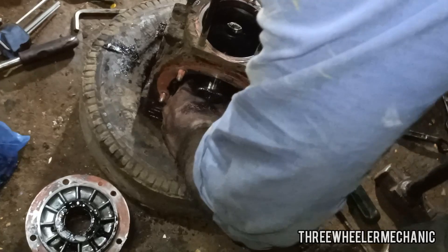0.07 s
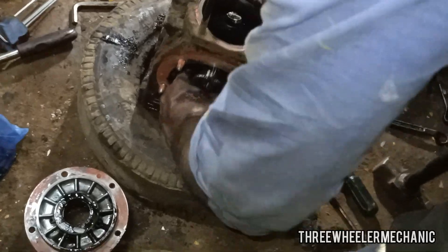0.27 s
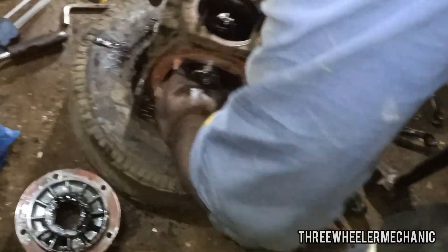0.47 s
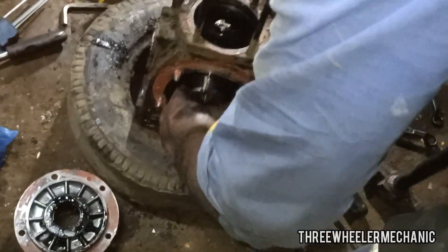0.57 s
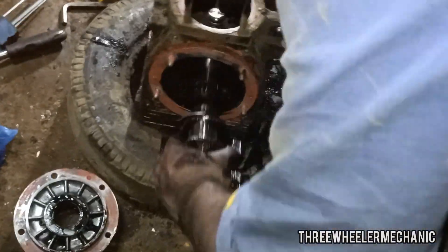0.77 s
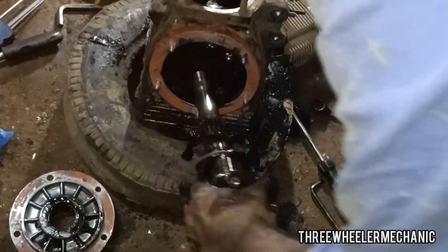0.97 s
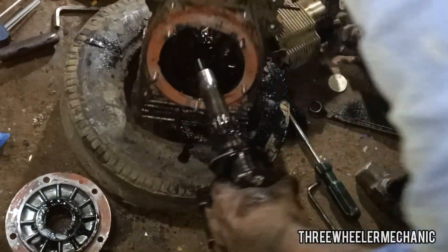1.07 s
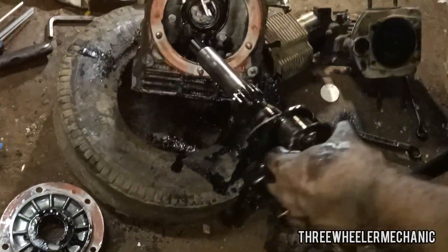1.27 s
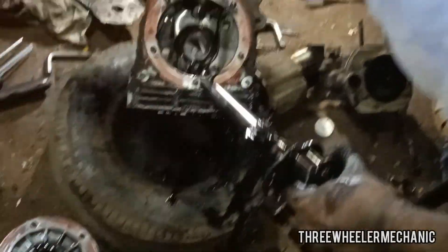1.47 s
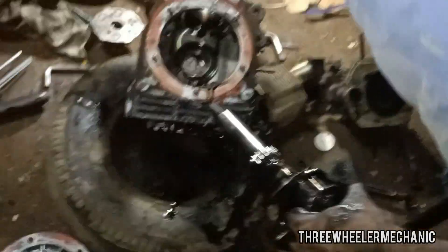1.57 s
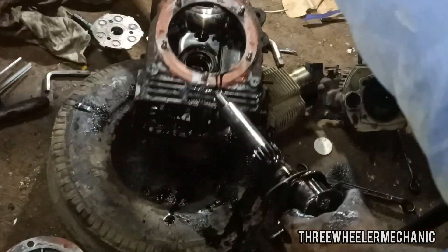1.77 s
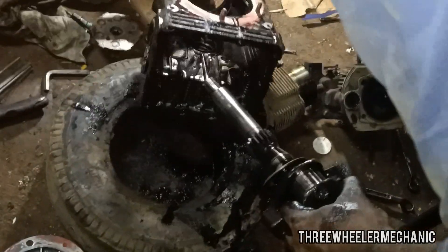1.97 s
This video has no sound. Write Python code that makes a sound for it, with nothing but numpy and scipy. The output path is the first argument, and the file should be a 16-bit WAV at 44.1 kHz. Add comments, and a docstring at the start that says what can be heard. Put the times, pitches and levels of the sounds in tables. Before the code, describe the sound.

Steel parts clank as a shaft knocks a metal casing three times in the first quarter second, loudest at about 0.1 seconds. From 0.3 to 0.6 seconds its gear scrapes, squeaks and clinks with a short ring. Then it is quieter: a faint tick near 1 second, a light tap at 1.4, and a soft sliding hiss around 1.8. A low workshop hum lies underneath.

```python
"""A steel shaft with its gear is worked out of an oily gearbox casing that rests on a tyre.
Each knock on the casing excites a dense, short clatter and a few longer normal modes. The gear clinks
and rings as it comes free, while friction in the bore makes it scrape and squeak by stick-slip.
The casing rocks with soft bumps and slides on the tyre with a hiss, and the shaft tip taps its rim.
Under it all lie the low hum of a workshop and a faint, dull reverberation."""
import sys
import numpy as np
from scipy import signal
from scipy.fft import rfft, irfft, next_fast_len
from scipy.io import wavfile

SR = 44100
rng = np.random.default_rng(int(sys.argv[2]) if len(sys.argv) > 2 else 0)


def digitize_waveform(pressure):
    """Quantize a signal to 16-bit integers and store it at the path in sys.argv[1].

    Rows of a 2-D input are taken as channels; values are limited to [-1, 1].
    """
    field = np.atleast_2d(pressure).T
    bounded = np.clip(field, -1, 1)
    quanta = np.round(bounded * 32767).astype(np.int16)
    wavfile.write(sys.argv[1], SR, quanta)


N = 88949
T, HZ = np.arange(N) / SR, np.fft.rfftfreq(N, 1 / SR)

# Shaft on casing: t/s, relative level/dB, bass/dB per filter pass, treble/dB per filter pass,
# decay-time factor, ring level/dB, ring tilt/(dB per octave)
KNOCKS = [(0.001, -16.5, 3, 9.5, 1.09, -15.5, -4.5), (0.010, -23.5, -25, -3, 0.73, -34, 18),
          (0.023, -37, -6, 10.5, 0.22, -13, 6), (0.091, -38, 2.5, 1, 3, -53, -7),
          (0.1189, -12.5, 4, 6, 0.79, 5, 3.1), (0.231, -29.5, 3, 1.5, 1.56, -29.5, -13),
          (0.2381, -19.5, 4.5, 6.5, 0.53, -10.5, 1.5), (0.242, -40, -5, -3, 0.67, -28, -12),
          (0.2445, -30.5, 22, 19.5, 0.45, -41, -6), (0.2874, -27.5, 1.5, -22, 0.4, -46, -13)]
# Spectrum of a knock: f/Hz, level/dB per filter pass
KNOCK_SPECTRUM = [(60, -35), (170, -12.5), (265, -1.5), (400, -9), (600, -5.5), (800, -5.5), (1150, -2.5),
                  (1400, -5.5), (1650, -1.5), (2400, -6), (2850, -5.5), (3700, -10.5), (4400, -6),
                  (5300, -15.5), (6100, -15), (7700, -25), (10000, -21), (12500, -24), (15500, -54)]
# Decay of a knock: f/Hz, T60/s
KNOCK_T60 = [(250, 0.12), (900, 0.15), (3000, 0.13), (12000, 0.097)]
# Normal modes of the casing: f/Hz, level/dB, T60/s, left minus right/dB
CASING_MODES = [(268, -21, .11, 0), (763, -20.5, .09, 0), (832, -21, .095, 1), (1082, -21.5, .11, -2),
                (1207, -26.5, .39, -4), (1241, -21, .14, -1), (1585, -20, .14, -6), (1989, -27, .12, -3),
                (2739, -18.5, .10, -3), (2783, -20, .1, -4), (2876, -17, .13, 1), (2952, -23, .11, 0),
                (3015, -22, .12, 0), (3455, -26, .11, -6), (4259, -27, .10, -4), (6132, -42, .1, 4),
                (8371, -47, .15, -10), (10285, -44, .13, -8), (13148, -39, .12, -4), (13370, -40, .10, -3)]
# Workshop background: f/Hz, level/dB
HUM_SPECTRUM = [(25, -15), (90, -12), (118, -6), (195, -4.5), (260, -22), (350, -15), (550, -26),
                (1500, -26.5), (2400, -21), (3500, -32.5), (4400, -19), (5300, -36), (7200, -30),
                (8700, -21.5), (10500, -36), (13500, -54)]
# Gear on shaft and rim: columns as in KNOCKS
CLINKS = [(0.288, -52, 9, 10, 0.87, -22, -8), (0.3275, -29.5, -18, -4, 0.18, -20, 7.5),
          (0.406, -52.5, -12, 3, 2.9, -23, 5), (0.4504, -23, -2, 8.5, 0.21, -30, -13),
          (0.4635, -32, 3.5, -6.5, 1.7, -3.5, -3), (0.489, -32.5, 3.5, 3, 2.1, -26, 11),
          (0.5059, -31.5, 1, -6, 0.73, -18, -5), (0.5202, -22.5, 2, 3, 0.54, 1, -1)]
# Spectrum of a clink: f/Hz, level/dB per filter pass
CLINK_SPECTRUM = [(170, -21.5), (280, 4), (480, -12.5), (900, 4), (1200, -5.5), (1600, 6), (2450, 4.5),
                  (2950, -1), (4200, 2), (5400, -7), (6400, -2.5), (7600, -9.5), (10200, -6), (12500, -19),
                  (15500, -64)]
# Normal modes of the gear: f/Hz, level/dB, T60/s, left minus right/dB, beat rate/Hz,
# half the beat amplitude/dB (negative swells after the hit)
GEAR_MODES = [(868, -37.5, .29, 5, 9, -4), (1570, -28.5, .52, -6, 4, -3), (1590, -34, .2, -5, 0, 0),
              (2229, -36.5, .36, -10, 7, 2), (3440, -21, .32, -1, 9, 1.5), (4237, -32.5, .17, -8, 14, -2),
              (5588, -40.5, .14, -7, 0, 0), (8382, -45, .18, -10, 22, 2), (13250, -48, .16, -4, 0, 0)]
# Steel sticking and slipping: t/s, duration/s, f/Hz, bandwidth/Hz, level/dB
SQUEAKS = [(0.294, 0.042, 2228, 39.5, -34), (0.314, 0.021, 4660, 120, -39.5),
           (0.393, 0.049, 1604, 119, -38), (0.433, 0.04, 1552, 40, -35), (0.447, 0.0084, 2465, 298, -23.5),
           (0.468, 0.046, 1580, 47, -21), (0.472, 0.087, 13200, 303, -48), (0.473, 0.043, 9780, 260, -37),
           (0.37, 0.049, 9700, 350, -44), (0.361, 0.047, 11600, 700, -41), (0.368, 0.055, 13800, 900, -54),
           (0.711, 0.055, 3980, 150, -57.5), (1.261, 0.13, 4020, 380, -53),
           (1.587, 0.044, 1590, 109, -43.5), (1.927, 0.27, 2413, 35, -55), (0.8, 0.048, 9280, 79, -51),
           (0.808, 0.098, 13400, 120, -59.5)]
# Gear teeth scraping through the bore
SCRAPE_ENVELOPE = [(0, -59.5), (0.31, -61), (0.335, -44.5), (0.358, -47), (0.372, -40), (0.395, -42.5),
                   (0.425, -49), (0.5, -69)]  # t/s, level/dB
SCRAPE_SPECTRUM = [(300, -26.5), (1500, -8), (4980, 1), (5450, -6), (6000, 1), (7700, -14.5), (9900, -3),
                   (11900, -4.5), (13000, -28), (14000, -13), (15500, -23)]  # f/Hz, level/dB
# Casing rocking on the tyre: columns as in SQUEAKS
BUMPS = [(0.845, 0.044, 124, 70, -47), (0.557, 0.058, 150, 40, -49), (1.188, 0.071, 30, 47, -49),
         (1.212, 0.38, 146, 7.4, -50), (1.578, 0.062, 82, 106, -47)]
# Casing sliding on the tyre
SLIDE_ENVELOPE = [(0.75, -68), (0.95, -54.5), (1.1, -64), (1.38, -60.5), (1.48, -51), (1.57, -55.5),
                  (1.64, -49), (1.71, -39.5), (1.8, -38.5), (1.86, -40.5), (1.94, -54), (2.01, -47)]  # t/s, level/dB
SLIDE_SPECTRUM = [(250, -4.5), (700, -19.5), (1300, -9), (2000, -8), (2900, 2), (4700, -5), (6300, -4),
                  (7800, -17.5), (9300, -15), (11300, -6.5), (13500, -13), (15500, -21)]  # f/Hz, level/dB
SLIDE_BALANCE = [(500, 1), (2500, -2.5), (5000, -1), (7000, 11), (8400, -4), (11500, -9), (15000, 6.5)]  # f/Hz, left minus right/dB
# Shaft tip on the rim: columns as in KNOCKS, without ring tilt
TAPS = [(0.9616, -41, -19, -19, 0.29, -27), (1.4228, -30.5, 1, 8, 0.68, -2),
        (1.715, -40, -5.5, -11, 0.89, -23)]
# Spectrum of a tap: f/Hz, level/dB per filter pass
TAP_SPECTRUM = [(120, -30), (330, -4), (560, -3), (700, -11.5), (930, -2), (1220, -8), (1600, -4),
                (2000, -1.5), (2350, -10), (2740, 0), (3200, -6), (4600, -7.5), (5300, -35), (7000, -16.5),
                (8000, -48), (15000, -46)]
# Normal modes of the rim: columns as in CASING_MODES
RIM_MODES = [(930, -33, .07, 0), (1983, -41, .07, -3), (2730, -33, .09, -5), (4608, -44, .06, -3)]
# Sound field at the two ears
COHERENCE = [(30, 0.26), (120, 1), (350, 0.95), (700, 0.65), (1300, 0.3), (3000, 0.092), (12000, 0.05)]  # f/Hz, left-right correlation
BALANCE = [(300, -0.5), (800, -3), (1500, -3.5), (3000, -9.5), (4500, -7.5), (6500, -3), (9000, -5.5),
           (13000, -22)]  # f/Hz, left minus right/dB


def amp(db):
    """Amplitude ratio for a level in decibels."""
    return 10 ** (np.asarray(db) / 20)


def unit_rms(x):
    """Normalisation to unit mean power."""
    return x / np.sqrt(np.mean(x ** 2) + 1e-20)


def curve(points, hz=HZ):
    """Interpolation on a logarithmic frequency axis."""
    f, value = np.transpose(points)
    return np.interp(np.log(hz + 1), np.log(f + 1), value)


def pan(db):
    """Left and right gains for an interaural level difference."""
    return amp(np.array([[.5], [-.5]]) * db)


def noise(gain, balance=BALANCE):
    """Partially coherent stereo noise of unit rms, its spectrum weighted by gain."""
    left, independent = rfft(rng.standard_normal((2, N)))
    coherence = curve(COHERENCE)
    right = coherence * left + np.sqrt(1 - coherence ** 2) * independent
    return unit_rms(irfft(np.array([left, right]) * gain * pan(curve(balance)), N))


def ripple(depth_db=3.5, spacing_hz=116, onset_hz=1560):
    """Modal overlap: crowded high modes give random spectral peaks and dips, in dB for each side."""
    lag = np.fft.rfftfreq(len(HZ), HZ[1])
    smoothing = np.exp(-(lag * spacing_hz) ** 2)
    peaks = unit_rms(irfft(rfft(rng.standard_normal((2, len(HZ)))) * smoothing, len(HZ)))
    return depth_db * np.clip(peaks, -2, 2) * HZ ** 2 / (HZ ** 2 + onset_hz ** 2)


def body_filter(x, db):
    """Causality: a minimum-phase filter, since a body responds only after it is struck."""
    cepstrum = irfft(np.log(unit_rms(amp(db))), N)
    causal = cepstrum * (1 + np.sign(np.fft.fftfreq(N)))
    return irfft(rfft(x) * np.exp(rfft(causal)), N)


def impact(spectrum_db, t60, start, db, bass_db, treble_db, decay, bass_hz=955, treble_hz=4800):
    """Impulse response of crowded modes: a crack and decaying noise, in two passes of the body filter."""
    bass = bass_db / (1 + (HZ / bass_hz) ** 4)
    treble = treble_db / (1 + (treble_hz / (HZ + 1)) ** 4)
    pass_db = spectrum_db + bass + treble
    hz, t, frames = signal.stft(noise(1), SR, nperseg=256)
    fade = amp(-60 * np.maximum(t - start, 0) / (decay * curve(t60, hz)[:, None]))
    burst = signal.istft(frames * fade, SR, nperseg=256)[1][:, :N]
    crack = (T >= start) * amp(2 * np.exp(-abs(T - start) / 0.0027))  # the first instant stands out
    return amp(db) * body_filter(body_filter(crack * burst, pass_db), pass_db)


def ring(modes, hits, sag_hz=0, sag_s=0.017, rise_s=0.0011):
    """Modal superposition: each hit (t/s, level/dB, tilt/(dB per octave)) feeds the same damped modes."""
    out = np.zeros((2, N))
    times = np.array([hit[0] for hit in hits])
    latest_hit = times[np.maximum(np.searchsorted(times, T) - 1, 0)]
    age = np.maximum(T - latest_hit, 0)
    rise = np.exp(-1 / (rise_s * SR))
    for hz, db, t60, pan_db, *beating in modes:
        beat_hz, half_beat_db = beating or (0, 0)
        octaves = np.clip(np.log2(hz / 2500), -1.6, 1.6)
        energy_in = np.zeros(N)
        for start, hit_db, tilt in hits:
            energy_in[round(start * SR)] += amp(hit_db + tilt * octaves) ** 2
        energy = signal.lfilter([1], [1, -amp(-60 / (t60 * SR)) ** 2], energy_in)
        beat = amp(2 * half_beat_db * np.cos(2 * np.pi * beat_hz * age))
        envelope = signal.lfilter([1 - rise], [1, -rise], np.sqrt(energy) * beat)
        ear_phase = np.array([[0], [rng.choice([-1, 1]) * np.arccos(curve(COHERENCE, hz))]])
        cycles = np.cumsum(hz + sag_hz * np.exp(-age / sag_s)) / SR  # contact briefly stiffens the mode
        tone = np.sin(2 * np.pi * (cycles + rng.random()) + ear_phase)
        out += amp(db) * pan(pan_db) * envelope * tone
    return out


def resonance(start, duration, hz, width_hz, db, skew=1, fall=0, evenness=0.95):
    """A randomly driven resonance swells and fades; its pitch wanders and drops by the fraction fall."""
    arch = np.sin(np.pi * np.clip((T - start) / duration, 0, 1) ** skew) ** 2
    band = noise(1 / (1 + (2 * (HZ - hz) / width_hz) ** 2))
    analytic = signal.hilbert(band, next_fast_len(N))[:, :N]
    centre_s = np.average(T, weights=arch)
    glide = analytic * np.exp(-1j * np.pi * fall * hz / duration * (T - centre_s) ** 2)
    steady = glide.real / (abs(glide).mean(0) + 1e-9) ** evenness
    return amp(db) * unit_rms(steady * np.sqrt(arch)) * np.sqrt(arch.mean())


def friction(spectrum_db, envelope, balance, flutter_hz, flutter_db):
    """Sliding friction: broadband noise whose level fluctuates at random about an envelope."""
    hiss = noise(amp(spectrum_db), balance)
    flutter = unit_rms(irfft(rfft(rng.standard_normal(N)) / (1 + (HZ / flutter_hz) ** 4), N))
    return hiss * amp(np.interp(T, *np.transpose(envelope)) + flutter_db * flutter)


def casing_knocks():
    """Impact excitation: the shaft strikes the casing, which clatters and rings in its normal modes."""
    spectrum_db = curve(KNOCK_SPECTRUM) + ripple()
    clatter = sum(impact(spectrum_db, KNOCK_T60, *row[:5]) for row in KNOCKS)
    return clatter + ring(CASING_MODES, [(t, db, tilt) for t, *_, db, tilt in KNOCKS])


def reverberation(x, db=-20.5, t60=0.26, cutoff_hz=4000, delay_s=0.006):
    """Diffuse reflection: the room convolves the sound with a dull, exponentially decaying tail."""
    tail = noise(1 / (1 + (HZ / cutoff_hz) ** 2) ** .5) * amp(-60 * T / t60) * (T > delay_s)
    tail /= np.linalg.norm(tail, axis=1, keepdims=True)
    return amp(db) * signal.fftconvolve(x, tail, axes=1)[:, :N]


def workshop_hum(db=-52.5):
    """Stationary background noise, with its power mostly at low frequencies."""
    return amp(db) * noise(amp(curve(HUM_SPECTRUM)), balance=[(200, -2.4), (4000, -4.0)])


def gear_clinks(t60=0.091, grip_s=0.68, grip_db_per_s=90):
    """Free vibration: the struck gear rings and beats until the hand holding the shaft damps it."""
    spectrum_db = curve(CLINK_SPECTRUM) + ripple()
    clinks = sum(impact(spectrum_db, [(1, t60)], *row[:5]) for row in CLINKS)
    ringing = ring(GEAR_MODES, [(t, db, tilt) for t, *_, db, tilt in CLINKS], sag_hz=18.96)
    return clinks + ringing * amp(-grip_db_per_s * np.maximum(T - grip_s, 0))


def steel_squeaks():
    """Stick-slip oscillation: each squeak catches quickly, lets go slowly and falls slightly in pitch."""
    return sum(resonance(*row, skew=0.47, fall=0.019) for row in SQUEAKS)


def bore_scrape():
    """Frictional excitation: gear teeth rub through the bore and drive its crowded modes."""
    spectrum_db = curve(SCRAPE_SPECTRUM) + 0.91 * ripple()
    return friction(spectrum_db, SCRAPE_ENVELOPE, BALANCE, flutter_hz=120, flutter_db=4.0)


def tyre_bumps():
    """Low resonances swell and fade as the casing rocks on the tyre."""
    return sum(resonance(*row) for row in BUMPS)


def tyre_slide():
    """Sliding friction between the tipped casing and the tyre makes a soft hiss."""
    return friction(curve(SLIDE_SPECTRUM), SLIDE_ENVELOPE, SLIDE_BALANCE, flutter_hz=94, flutter_db=1.6)


def rim_taps(t60=0.11):
    """Light impacts of the shaft tip excite the rim's strongly damped modes."""
    spectrum_db = curve(TAP_SPECTRUM) + ripple()
    taps = sum(impact(spectrum_db, [(1, t60)], *row[:5]) for row in TAPS)
    return taps + ring(RIM_MODES, [(t, db, 0) for t, *_, db in TAPS])


def scene():
    """Linear superposition of the metal sounds, their reverberation, the bumps and the hum."""
    metal = casing_knocks() + gear_clinks() + rim_taps() + bore_scrape() + tyre_slide() + steel_squeaks()
    return metal + tyre_bumps() + reverberation(metal) + workshop_hum()


def record(dry):
    """Soft saturation rounds the highest peaks; a low-pass filter limits the band."""
    ceiling, cutoff_hz = 0.85, 15700
    rounded = dry / (1 + (dry / ceiling) ** 6) ** (1 / 6)
    lowpass = signal.firwin(511, cutoff_hz, window=("kaiser", 9), fs=SR)
    return signal.oaconvolve(rounded, lowpass[None], "same")


dry = scene()
out = record(dry)
digitize_waveform(out)
```